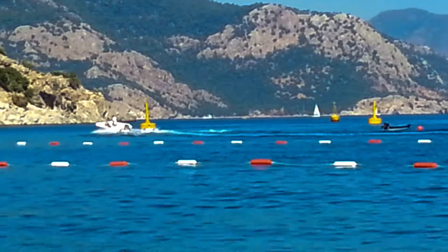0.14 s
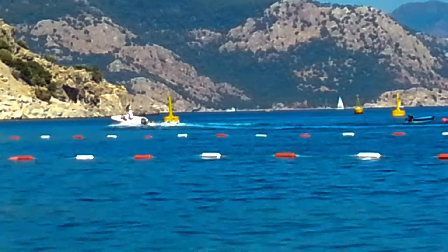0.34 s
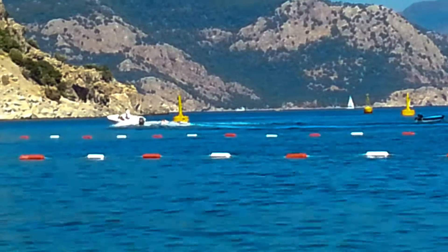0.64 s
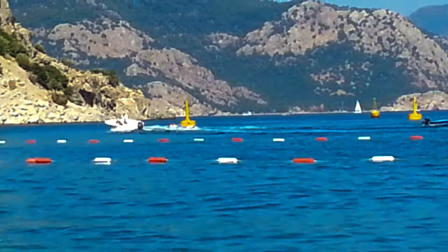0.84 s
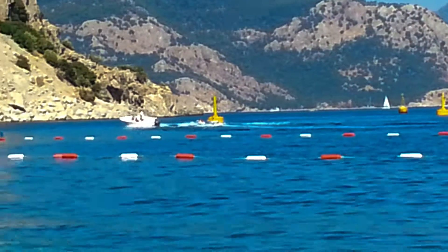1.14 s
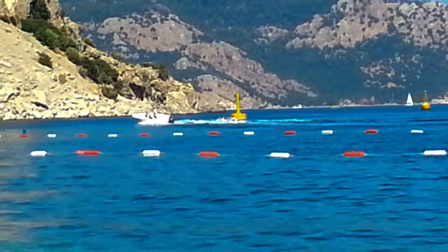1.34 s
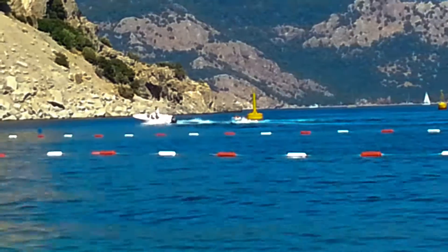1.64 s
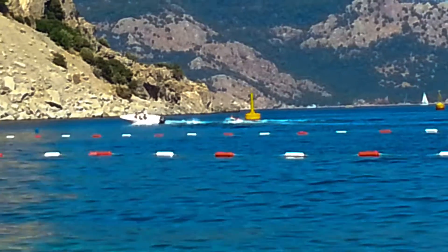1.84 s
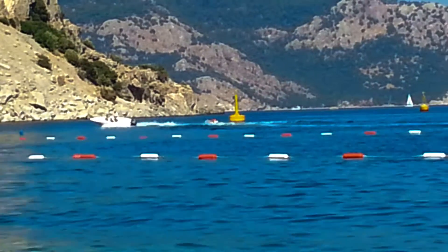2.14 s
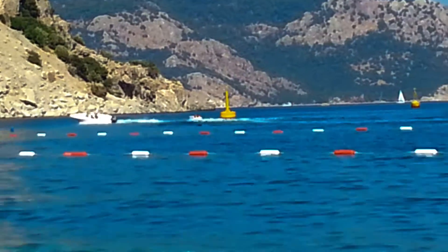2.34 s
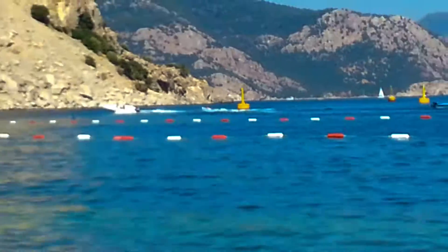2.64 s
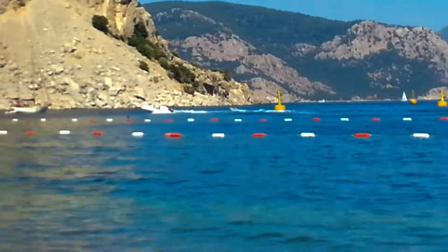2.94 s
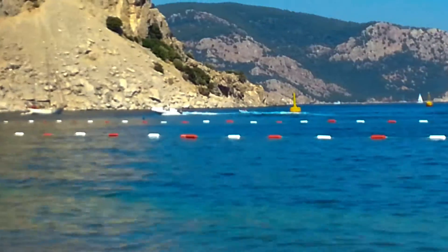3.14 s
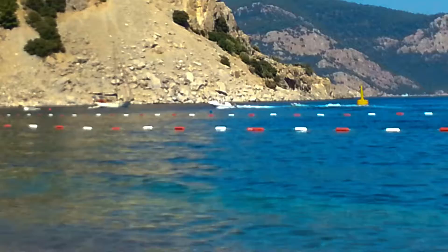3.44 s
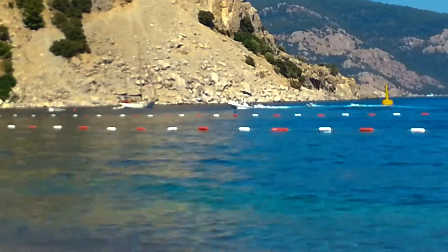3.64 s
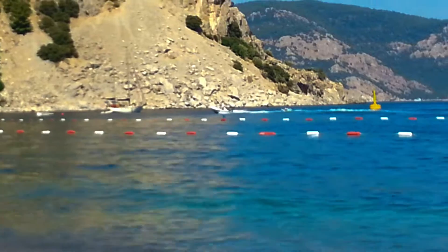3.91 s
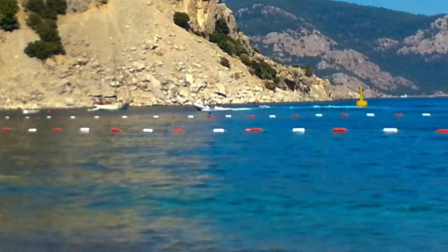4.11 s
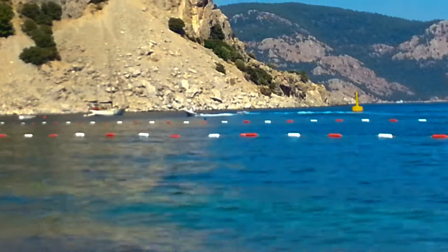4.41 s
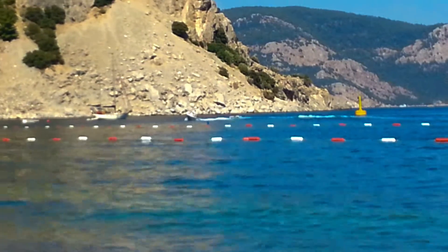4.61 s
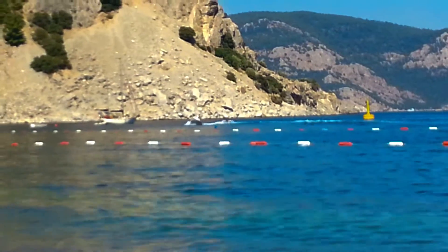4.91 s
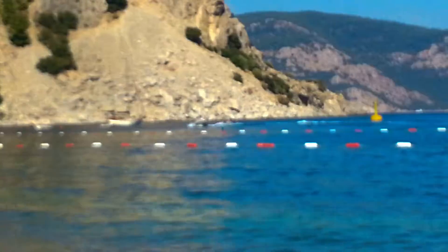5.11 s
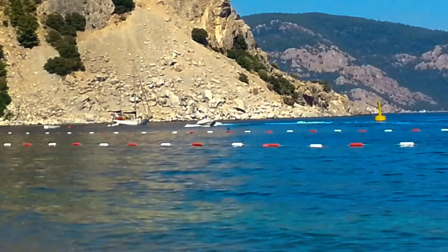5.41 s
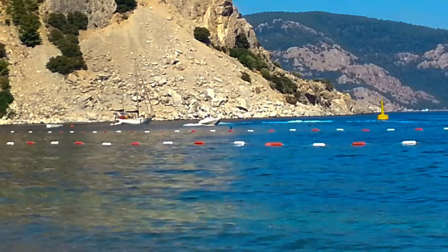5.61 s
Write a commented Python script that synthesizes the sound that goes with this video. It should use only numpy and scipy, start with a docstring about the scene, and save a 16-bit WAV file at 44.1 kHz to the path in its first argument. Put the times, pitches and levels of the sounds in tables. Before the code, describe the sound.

Close stereo outdoor sound of a calm bay's pebble edge. A small wave slaps and gurgles at once, then drains leftward with fizzing bubbles and clicking pebbles. After a lull, a sharper double splash breaks at about three seconds with bright spray, trickles away, and a soft new wave begins at the end.

```python
"""A beach of fine pebbles in a calm bay: small waves run in, heard first from far left of a camera.
A dull rush of noise swells before each wave; bursts of drops and foam are the crests slapping down.
Ringing grains make the bubbles, fizz and rolling pebbles; wandering resonances make gurgles and backwash.
Two microphone ports, a short lag apart, hear it all in the open air."""
import sys
import numpy as np
from scipy import signal
from scipy.fft import rfft, irfft
from scipy.io import wavfile
from scipy.ndimage import map_coordinates

SR = 44100
rng = np.random.default_rng(int(sys.argv[2]) if len(sys.argv) > 2 else 0)


def dump_mix(stems):
    """Bounce the given channels to the path in sys.argv[1] as a 16-bit WAV at rate SR."""
    frames = np.atleast_2d(stems).T  # one column per channel
    limited = np.clip(frames, -1, 1)  # hard clip at full scale
    pcm = np.round(limited * 32767).astype(np.int16)
    wavfile.write(sys.argv[1], SR, pcm)


N = 254000
TIME = np.arange(N) / SR  # seconds
HZ = np.fft.rfftfreq(N, 1 / SR)
PORT_LAG_S = 0.000404  # travel time of sound from one port to the other


def gain_of(db):
    """Decibels to gain."""
    return 10 ** (np.asarray(db) / 20)


def evened(x):
    """Scales each row to rms 1."""
    return x / np.sqrt(np.mean(x ** 2, axis=-1, keepdims=True) + 1e-20)


def read(points):
    """Reads a table over frequency, joined by straight lines on a log axis."""
    hz, value = np.transpose(points)
    return np.interp(np.log(HZ + 1), np.log(hz + 1), value)


def add(mix, start_s, sound):
    """Mixes a sound in at its start time, cut off at the end of the mix."""
    part = mix[max(round(start_s * SR), 0):][:len(sound)]
    part += sound[:len(part)]


def wavering(per_s):
    """A slow random drift of about unit size, with a new target per_s times a second."""
    steps = rng.standard_normal(1024)
    return np.interp(TIME * per_s, np.arange(len(steps)), steps)


# stretches of the waterline as seen from the microphones: bearing_deg (left negative)
SHORE = np.array([-88, -62, -43, -24, -12, 2, 19, 42, 76])


def lumps(per_s, depth_db):
    """Water arrives in uneven lumps of limited size, differently on each stretch of shore."""
    steps = np.clip(rng.standard_normal((2048, len(SHORE))).T, -1.4, 1.4)
    heights = gain_of(depth_db * steps)
    return evened(np.array([np.interp(TIME * per_s, np.arange(len(h)), h) for h in heights]))


def grains(low_hz, high_hz, cycles, spread_db, glide, count, size):
    """Many short rings of random pitch, size and place; a glide upward makes them bubbles."""
    when, where, pitch, chance = rng.random((count, 4)).T
    hz = low_hz * (high_hz / low_hz) ** pitch
    # a few rings are much larger than the rest, up to a limit
    height = hz * gain_of(spread_db * np.minimum(-np.log(1 - chance), 3.6))
    turns = (hz[:, None] * np.arange(size) / SR).astype(np.float32)
    age = turns / cycles  # each ring decays over the same number of cycles
    rings = height[:, None] * np.exp(-age) * np.sin(2 * np.pi * turns * (1 + glide * age))
    # the stretches lie end to end while the rings are summed
    start = (where * len(SHORE)).astype(int) * N + (when * (N - size)).astype(int)
    samples = start[:, None] + np.arange(size)
    out = np.bincount(samples.ravel(), rings.ravel(), len(SHORE) * N)
    return evened(out.reshape(-1, N))


def seethe(near, blur_db):
    """Single grains stand out of a blur of countless smaller ones, made of noise."""
    return evened(near + gain_of(blur_db) * rng.standard_normal(near.shape))


def resonate(x, hz, width_hz):
    """A moving resonance: shifts the curve hz down to zero, smooths, and shifts back."""
    turn = np.exp(2j * np.pi * np.cumsum(hz) / SR)
    r = np.exp(-np.pi * width_hz / SR)
    smooth = signal.lfilter([1 - r], [1, -r], x / turn)
    return 2 * (turn * smooth).real


def facing(bearing_deg, width_deg, around_db):
    """Gain of each stretch in a sound centred on a bearing, over some sound from all around."""
    focus = np.exp(-((SHORE[:, None] - bearing_deg) / width_deg) ** 2) + 1e-9
    power = focus / focus.sum(0) + gain_of(around_db) ** 2 / len(SHORE)
    return np.sqrt(power / power.sum(0))


def from_shore(stretches, colour):
    """Colours the sound of each stretch and carries it to the two ports with its own lag."""
    lag_s = -PORT_LAG_S * np.sin(np.radians(SHORE))
    spectrum = rfft(stretches) * evened(gain_of(read(colour)))
    left = spectrum.sum(0)
    right = (spectrum * np.exp(-2j * np.pi * lag_s[:, None] * HZ)).sum(0)
    return irfft(np.array([left, right]), N)


def from_left(x, low_hz):
    """A small source on the left has no bass and reaches the left port first."""
    thin = signal.sosfilt(signal.butter(3, low_hz, "high", fs=SR, output="sos"), x)
    return np.array([thin, np.interp(TIME - PORT_LAG_S, TIME, thin)])


# waves that build, break, run up and drain; the last is still on its way at the end:
# break_s, strength_db, build_s, drained_after_s, bearing_deg (left negative), backwash_pitch_hz
WAVES = [(0.31, -0.48, 0.57, 2.09, -5.5, 2030), (3.33, 0.4, 0.24, 1.24, -34, 2150),
         (6.05, -3, 0.23, 2, -25, 2100)]
# colour of the far rush: pitch_hz, relative level_db (per Hz)
WASH = [(30, -57), (65, -34), (115, -41.5), (180, -19), (260, -10.5), (430, -7.5), (600, 0.3), (800, 2),
        (1050, -3.5), (1400, -2.5), (2700, -7), (3800, -24), (6000, -18.5), (9700, -24), (11000, -24.5),
        (14500, -46)]


def wash(calm_db=-40.0, swell_db=-37.0, lead_s=0.35, spread_s=0.62):
    """Each wave first breaks far to the left: a smooth, dull rush swells over the calm of the bay."""
    swell = sum(gain_of(wave[1]) ** 2 * np.exp(-((TIME - wave[0] + lead_s) / spread_s) ** 2)
                for wave in WAVES)
    gain = np.sqrt(gain_of(calm_db) ** 2 + gain_of(swell_db) ** 2 * swell)
    rush = rng.standard_normal((len(SHORE), N)) * lumps(per_s=8.0, depth_db=-2.5)
    return from_shore(rush * gain * facing(bearing_deg=-84.0, width_deg=30, around_db=0.0), WASH)


# level of the fizzing film on the stones: time_s, level_db
FIZZ_LEVEL = [(0, -34.5), (0.22, -35), (0.7, -34), (1.3, -31), (2.1, -35.5), (2.7, -41.5), (3.05, -38),
              (3.75, -34.5), (4.2, -34), (5.1, -43), (5.4, -40.5), (5.76, -48)]


def fizz():
    """A film of tiny bubbles bursts on the wet stones, ahead of each wave and behind it."""
    bursts = grains(low_hz=2970, high_hz=4480, cycles=3.9, spread_db=0.5, glide=0, count=16000, size=200)
    pops = seethe(bursts, blur_db=-16.5)
    gain = gain_of(np.interp(TIME, *np.transpose(FIZZ_LEVEL)))
    colour = [(200, -52), (2200, 7.0), (3200, -2.5), (4200, -5.0), (5500, 1.5), (14500, -1.0)]
    return from_shore(pops * gain * facing(bearing_deg=-66, width_deg=100, around_db=-5.0), colour)


def surge(wave, db, lead_s, build_db, hold_s, drain_db, settle_db_per_s):
    """A wave's gain over time: it builds, holds, weakens as it drains, then settles."""
    start_s, strength_db, build_s, drain_s = wave[:4]
    age = TIME - start_s
    build = build_db * np.maximum(-age - lead_s, 0) / build_s
    drain = drain_db * np.clip((age - hold_s) / max(drain_s - hold_s, 1e-3), 0, 1)
    settle = settle_db_per_s * np.maximum(age - drain_s, 0)
    return gain_of(db + strength_db - build - drain - settle)


# colour of the small stones: pitch_hz, relative level_db (per Hz)
PEBBLES = [(120, -65), (260, -24.5), (600, -3), (1000, 0.5), (1400, 1), (1650, 2.5), (2000, 3), (2700, -4),
           (3800, -22), (6000, -14.5), (9700, -29), (14500, -59)]


def pebbles():
    """Wet pebbles click together in little slides all along the waterline, most of them left."""
    clicks = grains(low_hz=1200, high_hz=9000, cycles=2.8, spread_db=3.2, glide=0, count=20000, size=160)
    rattle = seethe(clicks, blur_db=2.5) * lumps(per_s=35, depth_db=-0.5)
    surges = [surge(wave, db=-30.0, lead_s=0.058, build_db=8.5, hold_s=0.62, drain_db=4.0,
                    settle_db_per_s=10.5) for wave in WAVES]
    gain = np.linalg.norm(surges, axis=0)
    return from_shore(rattle * gain * facing(bearing_deg=-60, width_deg=57.0, around_db=-2.0), PEBBLES)


# larger pebbles that knock together, and at 2.286 s the low plop of a large bubble: start_s, level_db (at the
# first instant, before the bass cut), pitch_hz
KNOCKS = [(0.104, -11.5, 2020), (0.2862, -7, 1890), (0.4444, -13, 2040), (0.4664, -9, 2040),
          (2.018, -15, 2230), (2.064, -15, 3300), (2.111, -17, 2000), (2.2862, -10, 1440),
          (2.5334, -20, 2390), (3.032, -22, 5500), (3.3855, -9, 5130), (3.4, -9, 2950), (3.4056, -12, 4530),
          (3.564, -12, 2780), (4.0024, -18, 2090), (4.503, -24, 2570), (4.6394, -19, 2170),
          (4.706, -20, 2000)]


def knocks(decay_s=0.0014, partner=0.91):
    """Two stones of unlike size ring for an instant, the larger one lower and much weaker; one low ring is a
    large bubble's plop."""
    out, t = np.zeros(N), TIME[:512]
    for start_s, level_db, hz in KNOCKS:
        ring = np.sin(2 * np.pi * hz * t) + 0.075 * np.sin(2 * np.pi * hz * partner * t)
        add(out, start_s, gain_of(level_db) * ring * np.exp(-t / decay_s))
    return from_left(out, low_hz=1300)


# fine spray over a crest: start_s, level_db (before the bass cut), length_s
MISTS = [(3.283, -33, 0.078), (3.6, -47, 0.1), (3.723, -40, 0.07)]


def mists(fade_s=0.028, rise_s=0.02):
    """Fine spray hangs over a breaking crest and hisses very high."""
    gain = 0
    for start_s, level_db, length_s in MISTS:
        rise = np.clip((TIME - start_s) / rise_s, 0, 1)
        fade = np.exp(-np.maximum(TIME - start_s - length_s, 0) / fade_s)
        gain = gain + gain_of(level_db) * rise * fade
    return from_left(gain * rng.standard_normal(N), low_hz=11025)


# a thin spit of spray ahead of a crest: start_s, level_db (of the tick, before the bass cut)
SPITS = [(3.2702, -23)]


def spits(decay_s=0.0009, mist_db=-20, mist_decay_s=0.08):
    """A fleck of spray bursts with a bright tick and a brief mist."""
    out, t = np.zeros(N), TIME[:8192]
    for start_s, level_db in SPITS:
        shape = np.exp(-t / decay_s) + gain_of(mist_db) * np.exp(-t / mist_decay_s)
        add(out, start_s, gain_of(level_db) * rng.standard_normal(len(t)) * shape)
    return from_left(out, low_hz=4000)


# the backwash is loudest late in the draining; shares are of a wave's draining time
BACKWASH_DB, BACKWASH_WIDTH_HZ, BACKWASH_WANDER_HZ = -33, 1100, 190
BACKWASH_PEAK_SHARE, BACKWASH_SPREAD_SHARE = 0.77, 0.31
BACKWASH_SAG_HZ = 356  # fall in pitch over one draining time


def backwash():
    """Water drains back between the stones in small bubbles whose pitch wanders and sinks."""
    flow, pitch = 0, WAVES[0][5]
    for start_s, strength_db, _, drain_s, _, hz in WAVES:
        past_peak = (TIME - start_s) / drain_s - BACKWASH_PEAK_SHARE
        flow = flow + gain_of(strength_db) * np.exp(-.5 * (past_peak / BACKWASH_SPREAD_SHARE) ** 2)
        pitch = np.where(TIME >= start_s, hz - BACKWASH_SAG_HZ * past_peak, pitch)
    pitch = pitch + BACKWASH_WANDER_HZ * wavering(per_s=30)
    pops = rng.standard_normal((len(SHORE), N)) * lumps(per_s=40, depth_db=4.5)
    once = resonate(pops, pitch, BACKWASH_WIDTH_HZ)
    trickle = evened(resonate(once, pitch, BACKWASH_WIDTH_HZ))
    return gain_of(BACKWASH_DB) * trickle * flow


# air folded under by a wave, as clouds of bubbles: peak_s, level_db, pitch_hz, rise_s, fade_s
GURGLES = [(0.02, -36, 2360, 0.031, 0.2), (0.1, -29, 1320, 0.026, 0.062), (0.23, -27.5, 2230, 0.084, 0.071),
           (0.24, -37, 4000, 0.094, 0.26), (0.305, -20, 1900, 0.03, 0.056), (0.31, -32, 3860, 0.03, 0.031),
           (0.325, -21.5, 1390, 0.029, 0.14), (0.42, -28, 2000, 0.031, 0.065),
           (0.6, -29, 1300, 0.033, 0.63), (0.65, -33.5, 700, 0.067, 0.59), (1.25, -38, 1860, 0.04, 0.044),
           (2.2, -39, 2000, 0.11, 0.25), (2.95, -43, 1850, 0.11, 0.12), (3.02, -35.5, 2800, 0.077, 0.15),
           (3.05, -41, 4060, 0.13, 0.22), (3.272, -33.5, 5560, 0.005, 0.078),
           (3.318, -28, 2010, 0.011, 0.031), (3.325, -27, 710, 0.012, 0.046),
           (3.345, -24, 1390, 0.035, 0.2), (3.4, -27, 666, 0.02, 0.028), (3.386, -28, 5200, 0.008, 0.042),
           (3.405, -29, 1940, 0.022, 0.088), (3.585, -26, 2700, 0.022, 0.091),
           (3.64, -24, 2000, 0.028, 0.1), (3.72, -32, 1350, 0.059, 0.63), (3.76, -34.5, 685, 0.051, 0.18),
           (3.77, -42, 2200, 0.044, 0.12), (4.04, -40, 3700, 0.04, 0.09), (4.16, -41, 2300, 0.02, 0.019),
           (4.26, -34.5, 2270, 0.035, 0.11), (4.53, -37, 2450, 0.045, 0.095),
           (4.64, -36, 2080, 0.023, 0.062), (5.2, -41, 2170, 0.088, 0.3), (5.35, -49, 5100, 0.022, 0.08),
           (5.42, -42, 760, 0.17, 0.7), (5.61, -39, 1100, 0.04, 0.25), (5.64, -35.5, 2900, 0.18, 0.43),
           (5.66, -47.5, 3940, 0.11, 0.18), (5.645, -36, 1850, 0.05, 0.088)]


def gurgles(width_hz=280, width_share=0.21, wander=0.023):
    """Clouds of bubbles of about one size ring together, swelling and dying away as their pitch shifts."""
    out = np.zeros((len(SHORE), N))
    pops = rng.standard_normal(out.shape) * lumps(per_s=58, depth_db=5.5)
    for peak_s, level_db, hz, rise_s, fade_s in GURGLES:
        span = (TIME > peak_s - rise_s) & (TIME < peak_s + 4 * fade_s)
        age = TIME[span] - peak_s
        pitch = hz * (1 + wander * wavering(per_s=31)[span])
        width = width_hz + width_share * hz
        cloud = evened(resonate(resonate(pops[:, span], pitch, width), pitch, width))
        swell = np.minimum(1 + age / rise_s, np.exp(-age / fade_s))
        out[:, span] += cloud * gain_of(level_db) * swell
    return out


PEEL_DEGREES = -55  # the broken water travels this far left along the beach as it drains


def whereabouts(width_deg, around_db):
    """Gain of each stretch in the broken water, which peels along the beach with the latest wave."""
    bearing = np.full(N, float(WAVES[0][4]))
    for start_s, _, _, drain_s, first_bearing, _ in WAVES:
        peeled = first_bearing + PEEL_DEGREES * np.minimum((TIME - start_s) / drain_s, 1)
        bearing = np.where(TIME >= start_s, peeled, bearing)
    return facing(bearing, width_deg, around_db)


def bubbling():
    """Gurgles travel with the broken water; the backwash drains far on the left."""
    moving = gurgles() * whereabouts(width_deg=47, around_db=-7.0)
    draining = backwash() * facing(bearing_deg=-66, width_deg=22, around_db=-16.0)
    return from_shore(moving + draining, [(150, -39), (700, -2)])


# colour of the broken water: pitch_hz, relative level_db (per Hz)
CHURN = [(120, -103), (180, -25), (260, -11), (430, -10.5), (600, -0.5), (760, 0), (1000, -3), (1400, 1.5),
         (2000, 2), (3800, -5), (6000, -18.5), (9700, -16.5), (11000, -31.5), (14500, -26.5)]


def churn():
    """Broken water: bubbles ring and rise in pitch under fizzing foam, moving along the beach."""
    bubbles = grains(low_hz=348.0, high_hz=3078, cycles=9.6, spread_db=1.45, glide=0.0098,
                     count=7000, size=1100)
    foam = grains(low_hz=2880, high_hz=14100, cycles=2.6, spread_db=0.5, glide=0, count=30000, size=64)
    water = seethe(gain_of(-9.0) * bubbles + foam, blur_db=2.0) * lumps(per_s=24, depth_db=0.6)
    surges = [surge(wave, db=-25.5, lead_s=0.0047, build_db=13.5, hold_s=0.28, drain_db=10.5,
                    settle_db_per_s=1.0) for wave in WAVES]
    gain = np.linalg.norm(surges, axis=0)
    return from_shore(water * gain * whereabouts(width_deg=50.0, around_db=-2.5), CHURN)


# crests that fall on the beach, each at full level from full_s on, for length_s:
# full_s, level_db, rise_s, length_s, foam_db (on the treble), bearing_deg (left negative)
SPLASHES = [(0.112, -36, 0.0092, 0.012, -7, -12), (0.284, -35, 0.014, 0.0053, 11, -17),
            (0.3, -25.5, 0.046, 0.02, 8, -6), (0.34, -30, .01, 0.088, -15, 5),
            (3.27, -38, 0.002, 0.02, 7, -30), (3.314, -24, 0.009, 0.007, 7, -30),
            (3.333, -26, 0.008, 0.02, 7, -24), (3.357, -22.5, 0.0048, 0.012, 4.5, -24),
            (3.385, -32, 0.007, 0.0037, 16, -62), (3.399, -21, 0.0031, 0.0071, 4, -57),
            (3.564, -25, 0.0022, 0.003, 10.5, -59), (3.583, -26.5, 0.0098, 0.014, 1.5, -61),
            (3.613, -34, 0.0046, 0.023, 11, -11), (3.737, -28, 0.015, 0.044, 4, -40),
            (3.804, -27.5, 0.015, 0.044, -1, -50), (4.033, -25.5, 0.015, 0.016, -15, -47),
            (5.615, -39.5, .07, 0.091, 0, -47)]
# colour of a falling crest: pitch_hz, relative level_db (per Hz)
SPLASH = [(120, -62), (180, -48), (260, -2), (430, -5), (600, 5), (850, 7.5), (1400, 5.5), (2000, 5),
          (3800, -0.5), (5300, -8.5), (6300, -14.5), (9700, -14.5), (11000, -24), (14500, -26)]


def splashes(fall_s=0.0079, foam_fall_s=0.063, spray_hz=4000):
    """A crest lands: a burst of drops lasts while it falls; its foam hisses on a little longer."""
    body, spray = 0, 0  # power over time below and above spray_hz
    for full_s, level_db, rise_s, length_s, foam_db, bearing in SPLASHES:
        since_end = np.maximum(TIME - full_s - length_s, 0)
        rise = np.clip(1 + (TIME - full_s) / rise_s, 0, 1)
        place = facing(bearing, width_deg=41, around_db=-16.5)
        power = (gain_of(level_db) * rise) ** 2 * place ** 2
        body = body + power * np.exp(-2 * since_end / fall_s)
        spray = spray + power * (gain_of(foam_db) ** 2 * np.exp(-2 * since_end / foam_fall_s))
    rings = grains(low_hz=570, high_hz=7300, cycles=9.3, spread_db=2.5, glide=0.013, count=9000, size=400)
    drops = seethe(rings, blur_db=9.5)
    dull = signal.sosfilt(signal.butter(1, spray_hz, fs=SR, output="sos"), drops)
    bright = drops - dull
    return from_shore(dull * np.sqrt(body) + bright * np.sqrt(spray), SPLASH)


# the echo off the beach: its delay, and the pitch above which the stones scatter it
BOUNCE_S, BOUNCE_TOP_HZ = 0.001536, 4470


def bounced(x, share=0.11):
    """A short echo off the beach combs the broken water into bands."""
    echo = share * np.exp(-2j * np.pi * HZ * BOUNCE_S) / (1 + (HZ / BOUNCE_TOP_HZ) ** 4)
    return irfft(rfft(x) * (1 + echo), N)


def patchy(x, patch_db=1.1, patch_hz=260, patch_s=0.05):
    """Small patches of pitch and time grow slightly louder or softer at random."""
    hz, t, spectra = signal.stft(x, SR, nperseg=512, noverlap=384)
    field = rng.standard_normal((256, 512))
    place = np.meshgrid(hz / patch_hz, t / patch_s, indexing="ij")
    patches = evened(map_coordinates(field, place, order=3, mode="wrap"))
    uneven = spectra * gain_of(patch_db * patches)
    return signal.istft(uneven, SR, nperseg=512, noverlap=384)[1][:, :N]


def scene():
    """All the sounds of the waterline."""
    waterline = patchy(bounced(churn() + bubbling()) + fizz() + pebbles())
    return wash() + waterline + splashes() + spits() + mists() + knocks()


# faint resonances of the camera's housing: pitch_hz, width_hz, level_db
HOUSING = [(567, 27, 1.5), (1980, 43, 1), (3720, 59, 4), (4910, 23, 4.5)]
# the two microphone ports differ in colour: pitch_hz, level_db (left minus right)
PORTS = [(210, 0.5), (360, -2), (520, 3), (750, -1), (1100, 0), (2200, 0), (3000, 2.5), (3800, 5.5),
         (4600, 5), (5700, -5), (7500, -0.5), (11000, 0), (12400, 14), (14500, 5)]
# the housing bends the phase between the ports: pitch_hz, phase_rad (by which left leads)
PORT_PHASE = [(200, 0.5), (700, -0.54), (950, 0.13), (1250, 0.45), (2000, 0.3), (2500, 0.19), (2900, 0.36),
              (3400, 0.33), (4200, 0.33)]
EDGE_HZ = 14800  # top of the band that is heard


def record(dry):
    """The housing lifts narrow bands, the ports differ in colour and phase; then the band limit."""
    housing_db = sum(db * np.exp(-((HZ - hz) / width) ** 2) for hz, width, db in HOUSING)
    sides = np.array([[.5], [-.5]])  # left and right share each difference
    tilt = gain_of(sides * read(PORTS)) * np.exp(1j * sides * read(PORT_PHASE))
    tilt = tilt / np.sqrt(np.mean(abs(tilt) ** 2, axis=0))
    heard = irfft(rfft(dry) * gain_of(housing_db) * tilt, N)
    band = signal.firwin(511, EDGE_HZ, window=("kaiser", 9), fs=SR)
    return signal.oaconvolve(heard, band[None], "same")


dry = scene()
out = record(dry)
dump_mix(out)
```